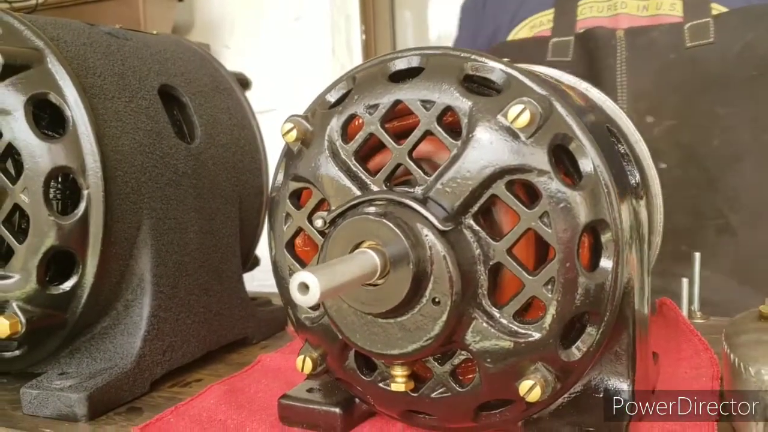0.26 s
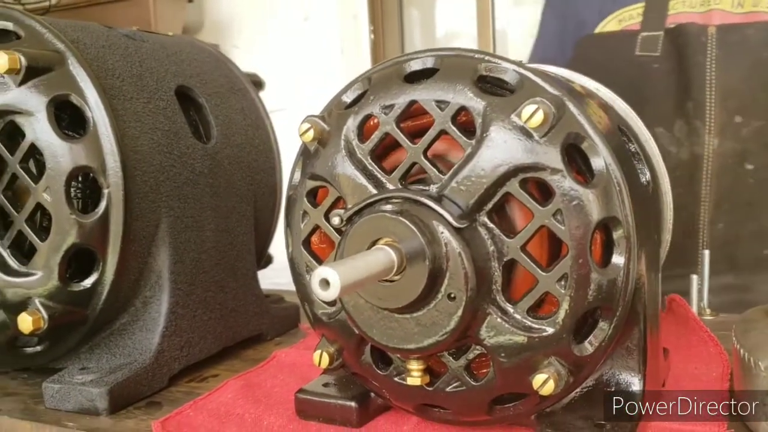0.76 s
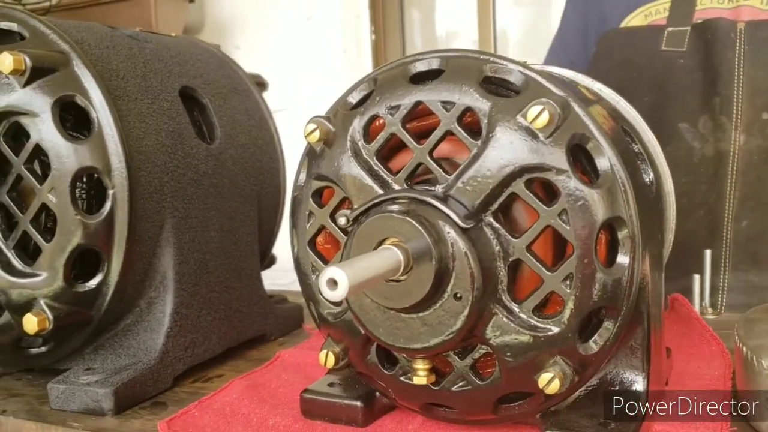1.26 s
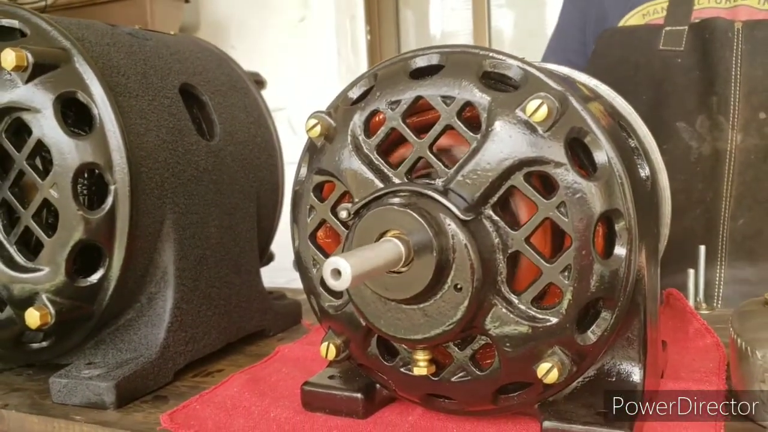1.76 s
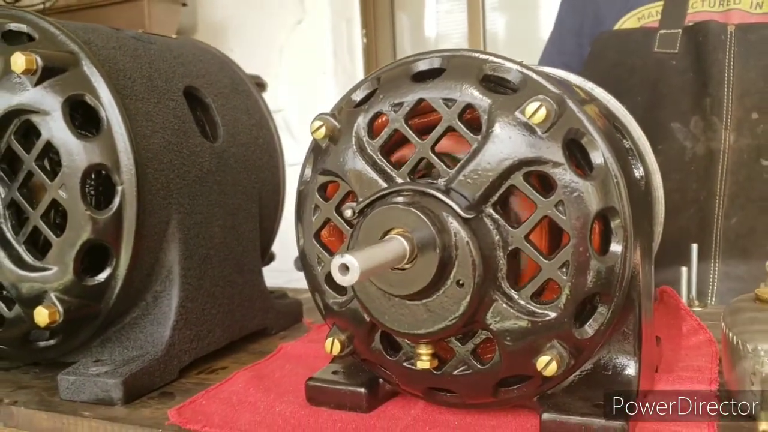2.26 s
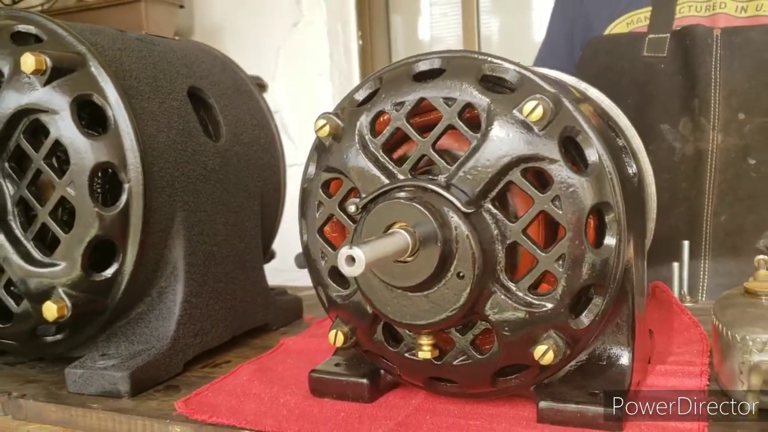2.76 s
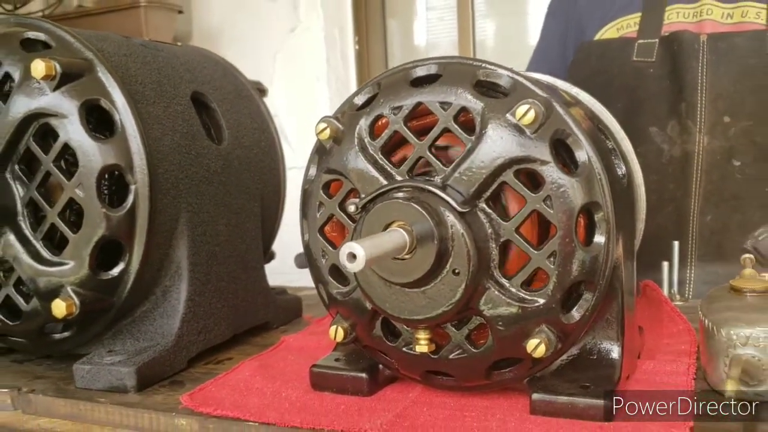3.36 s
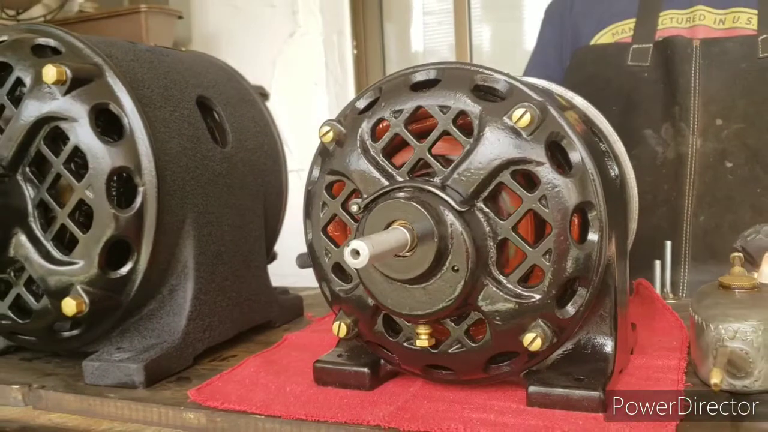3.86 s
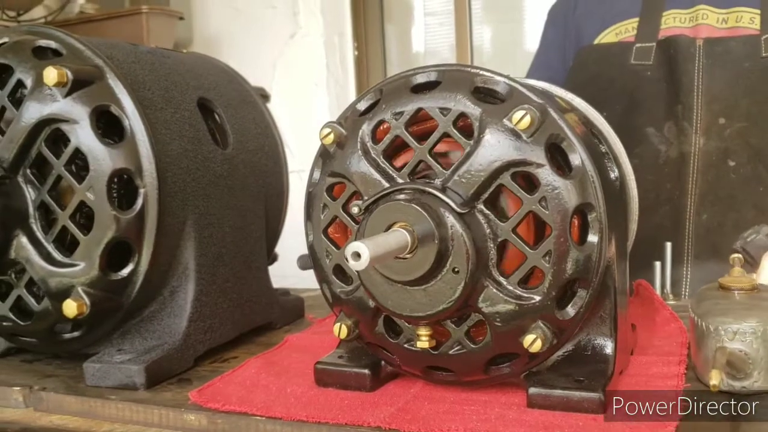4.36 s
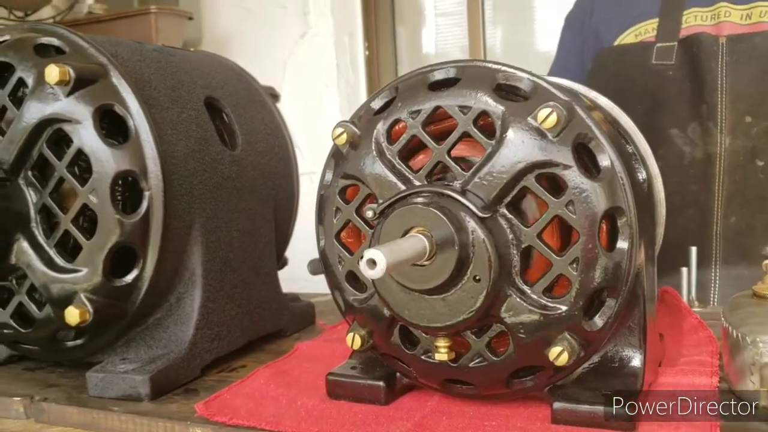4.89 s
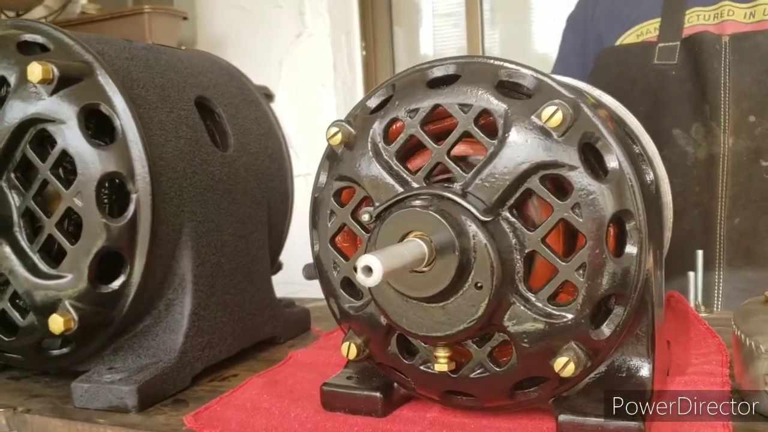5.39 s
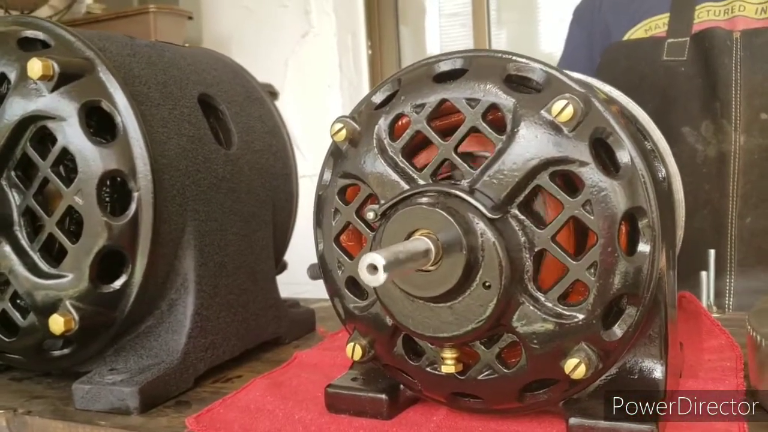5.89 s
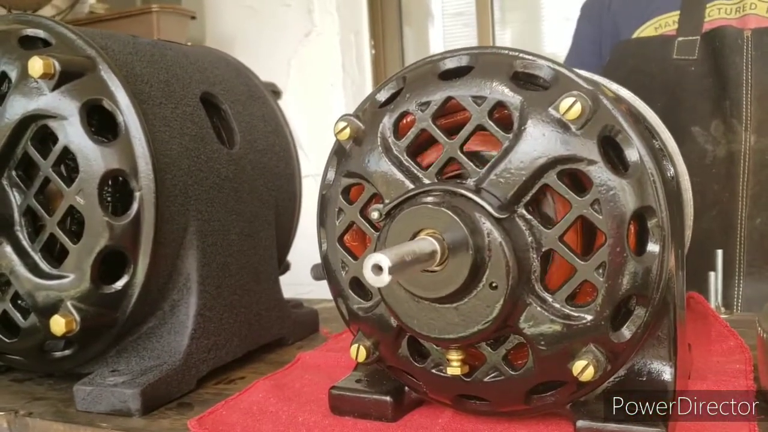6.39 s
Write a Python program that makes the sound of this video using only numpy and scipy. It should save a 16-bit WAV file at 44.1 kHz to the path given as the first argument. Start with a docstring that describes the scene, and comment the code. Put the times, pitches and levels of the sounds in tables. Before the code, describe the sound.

Close stereo sound of an old electric motor coasting down on a workshop bench. A bright, buzzy metallic whine falls steadily in pitch within crisp brush hiss. Soft low thumps from the bench flutter quickly at first, then disappear before the middle. The whine weakens into grainy ticking and the hiss dulls, pulsing once per turn. Tiny high squeaks gather near the end over quiet room rumble.

```python
"""On a workshop bench an old electric motor coasts down. Its brushes hiss on the commutator (the ring of
copper bars they rub on): noise that swells at high spots once a turn and pulses at every bar.
Ticks at the bar edges make a falling song. An unbalanced rotor thumps the resonant bench once a turn,
and when the motor is slow the brushes squeak in short whistles. Behind it lies a quiet shop:
room noise, a low rumble and hums that waver."""
import sys
import numpy as np
from scipy import signal
from scipy.fft import rfft, irfft, next_fast_len
from scipy.io import wavfile
from scipy.ndimage import uniform_filter1d

SR = 44100
rng = np.random.default_rng(int(sys.argv[2]) if len(sys.argv) > 2 else 0)


def output_pcm(signal):
    """Save a mono or channel-first signal as 16-bit PCM at the path in sys.argv[1].

    Samples are clipped to [-1, 1] before scaling.
    """
    pcm = np.clip(np.atleast_2d(signal).T, -1, 1) * 32767
    wavfile.write(sys.argv[1], SR, np.round(pcm).astype(np.int16))


N = 292510
SIZE = next_fast_len(N, True)   # length of the Fourier transforms, in samples

# Colour of the room noise. Each row: frequency in Hz, relative density in dB per Hz.
SHOP_COLOUR = [(15, -28), (25, -32), (60, -3.5), (100, -3), (150, -4), (250, -10), (386, -13), (550, -12),
               (800, -10), (1230, -13), (1700, -12), (2400, -21), (3310, -15.5), (4000, -30.5), (5000, -45),
               (5700, -43), (8000, -62), (11700, -58), (16000, -20)]
# Hums in the shop. Each row: frequency in Hz, waver width in Hz, usual level in dB, slow swell in dB.
SHOP_HUMS = [(86.9, 1.07, -55.5, 2), (119.8, 1.32, -50.5, 2), (145, 4.95, -55.5, -1.5),
             (346.8, 2.04, -63, 4)]
# The deepest sounds come and go. Each row: time in seconds, lowest hum in dB over its usual level,
# second hum in dB over its usual level, rumble level in dB.
BASS_CHANGES = [(0, 6, -17, -68), (.3, 7.5, -2.5, -57), (1.2, 6, 0.5, -66), (1.45, 0, -2, -57.5),
                (2.5, -10, -0.5, -55), (2.7, -1, -2.5, -56), (2.9, 2, 5, -54), (3.4, -1, 0.5, -55),
                (3.9, -1, 0, -54), (4.1, 7, 0, -56), (5.1, 1, -0.5, -54), (5.4, -6, -1, -58),
                (6.63, 1, 0.5, -56)]
# Ways the bench rings when thumped. Each row: frequency in Hz, relative push in dB,
# time to die away by 60 dB in seconds.
BENCH_MODES = [(184.4, 7.5, 0.35), (166, 1.5, 0.12), (202, 4.5, 0.23), (223, 9, 0.13), (287, 8, 0.07)]
# Brush squeaks. Each row: middle in seconds, level in dB before doubling, row number of the voice.
SQUEAK_EVENTS = [(4.75, -46, 2), (5.745, -47, 2), (5.86, -47, 0), (5.965, -52, 0), (6.026, -50, 0),
                 (6.074, -47, 0), (6.147, -48, 1), (6.167, -47, 2), (6.27, -55, 0), (6.317, -44, 0),
                 (6.392, -51, 2), (6.54, -46, 0), (6.546, -67, 1), (6.567, -43, 2), (6.598, -45, 0)]
# Squeak voices. Each row: frequency in Hz, half of the length in seconds, left over right in dB.
SQUEAK_VOICES = [(6540, 0.02, 7), (11500, 0.024, 4), (11920, 0.041, 5)]
# How the motor frame passes the bar ticks. Each row: frequency in Hz, relative gain in dB.
FRAME_GAIN = [(600, -45), (900, -30), (1050, -15), (1200, -14), (1350, -5), (1500, -5), (1700, -14),
              (1910, -1), (2030, -12), (2300, -10), (2800, -12), (3170, 0), (3400, -3), (3600, -2),
              (4000, 0), (4500, 0), (5000, 2), (5500, 3), (7000, 4), (9000, 5), (11000, 5), (13000, 4),
              (16000, 0)]
# Resonances and dips of the brush gear. Each row: frequency in Hz, width in Hz, lift in dB.
BRUSH_GEAR = [(2750, 300, -3), (3165, 170, 4.2), (3850, 250, 2), (4230, 200, -4), (4510, 190, 6),
              (4900, 300, 3.5), (5300, 250, -5), (6020, 330, 3.5), (6600, 350, 2), (7350, 450, 2.5),
              (8820, 160, 6.5), (9030, 160, 5), (10420, 600, 6), (11900, 500, 2.5), (13200, 450, 2),
              (14400, 500, 1.5)]
# Colour of the brush friction. Each row: frequency in Hz, relative density in dB per Hz.
HISS_COLOUR = [(500, -59), (900, -32), (1500, -29.5), (2000, -20.5), (2300, -19.5), (2700, -22.5),
               (3500, -29.5), (4300, -20), (5300, -15.5), (6500, -18), (8200, -12.5), (9500, -16.5),
               (11000, -13.5), (13000, -12), (16000, -14)]
# High spots on the commutator. Each row: place in the turn (0 to 1), width in turns, share of the swell.
HIGH_SPOTS = [(0.0, .045, 1.0), (.37, .04, .35), (.8, .04, .35)]
# Depth of the once-a-turn swell, scaled down in the lower bands. Each row: time in seconds, depth in dB.
SWELL_DEPTH = [(0, 2.5), (2.2, 2), (3.2, 4.5), (4.5, 5), (5.4, 2.5), (6.0, 0)]
# How alike left and right noise are. Each row: frequency in Hz, likeness (0 to 1).
SIDE_LIKENESS = [(60, 0.92), (130, 0.91), (290, 0.79), (640, 0.17), (1400, 0.016), (15000, 0.028)]
# Difference in colour between the sides. Each row: frequency in Hz, left over right in dB.
SIDE_BALANCE = [(60, 1), (100, 0.5), (180, 1), (310, 1.5), (550, 2), (950, 2), (1650, -1), (2860, -1),
                (4970, 2), (8640, 1), (15000, -0.5)]

ROOM_DB, RUMBLE_SWELL_DB = -44, 2.5
RUMBLE_HZ, RUMBLE_WIDTH_HZ = 40.8, 43
BARS = 40   # copper bars around the commutator
# the rotor slows by bearing friction and by air drag that grows with the square of the speed
START_TURNS_PER_S, FRICTION_TURNS_PER_S2, DRAG_PER_TURN = 18.627, 2.0182, .002186
# the knock grows while the rotor slows, until it is too slow to lift off the bench
KNOCK_AT = .85   # place in the turn, 0 to 1
KNOCK_DB, KNOCK_RISE_DB = -50.5, 8   # at the first speed, and rise per octave of speed lost
KNOCK_ENDS_TURNS_PER_S, KNOCK_FADE_TURNS_PER_S = 11.47, 0.49
# level at the first speed, and its loss per octave of speed lost (straight, and squared)
TONE_DB, TONE_LOSS_DB, TONE_LOSS_SQUARED_DB = -25.5, 2.5, 4   # bar song
HISS_DB, HISS_LOSS_DB, HISS_LOSS_SQUARED_DB = -30, -0.54, 1.5
# treble cut in dB per octave above 4 kHz (below zero is a lift), and its growth per octave of speed lost
DULL_DB, DULL_GAIN_DB = -6.5, 5.5
# the straight path: later on the right, and its strength against one reflection
RIGHT_LAG_S, STRAIGHT = .0005, 7
CUTOFF_HZ = 15470


def from_db(db):
    """Turn decibels into gain."""
    return 10 ** (np.asarray(db) / 20)


def rms_one(x):
    """Scale a signal to an average strength (rms) of 1."""
    return x / np.sqrt(np.mean(x ** 2) + 1e-20)


def in_time(rows):
    """Draw the columns of a table as curves over all samples."""
    s, *columns = np.transpose(rows)
    return [np.interp(np.arange(N) / SR, s, c) for c in columns]


def at_hz(points, hz):
    """Read a table at any frequency, with straight lines over log frequency."""
    table_hz, values = np.array(points).T
    return np.interp(np.log(np.maximum(hz, 1)), np.log(table_hz), values)


def drift(rate_hz):
    """Slow random wandering of spread 1: noise through two smoothers, made at every 40th sample."""
    r = np.exp(-80 * np.pi * rate_hz / SR)
    noise = rng.standard_normal(N // 40 + 2002)
    slow = signal.lfilter([1], [1, -2 * r, r * r], noise)[2000:]   # skip the filter's start
    return np.interp(np.arange(N) / 40, np.arange(len(slow)), rms_one(slow))


def coloured(gain):
    """Spectrum of stereo noise of rms 1, shaped by a gain; sides share a middle part by their likeness."""
    hz = np.fft.rfftfreq(SIZE, 1 / SR)
    mid, side = rfft(rng.standard_normal((2, SIZE))) * gain(hz)
    alike = np.clip(at_hz(SIDE_LIKENESS, hz), 0, 1)
    pair = np.sqrt(1 + alike) * mid + np.sqrt(1 - alike) * side * [[1], [-1]]
    return pair / np.sqrt(np.mean(irfft(pair, SIZE) ** 2)), hz


def shop(waver):
    """Room noise, a low rumble and tones that waver in pitch and level."""
    low_hum_db, second_hum_db, rumble_db = in_time(BASS_CHANGES)
    room, _ = coloured(lambda hz: from_db(at_hz(SHOP_COLOUR, hz)))
    out = from_db(ROOM_DB) * irfft(room, SIZE)[:, :N]
    rumble, _ = coloured(lambda hz: 1 / (1 + (2 * (hz - RUMBLE_HZ) / RUMBLE_WIDTH_HZ) ** 4))
    out += from_db(rumble_db + RUMBLE_SWELL_DB * drift(3.7)) * irfft(rumble, SIZE)[:, :N]
    for k, (hum_hz, width, db, swell_db) in enumerate(SHOP_HUMS):
        pitch = hum_hz + waver * width * drift(width)
        level_db = db + swell_db * drift(3.3) + 0.85 * drift(18.0)
        level_db = level_db + (k == 0) * low_hum_db + (k == 1) * second_hum_db
        out += from_db(level_db) * np.sqrt(2) * np.sin(2 * np.pi * np.cumsum(pitch) / SR)
    return out


def rotor_speed():
    """Turns per second of a rotor braked by steady friction and air drag."""
    scale = np.sqrt(FRICTION_TURNS_PER_S2 / DRAG_PER_TURN)
    t = np.arange(N) / SR
    return scale * np.tan(np.arctan(START_TURNS_PER_S / scale) - scale * DRAG_PER_TURN * t)


def bench_knock(turns, scatter_db, soft_hz, soften_db):
    """The unbalanced rotor pushes the bench once a turn and its modes ring; higher modes weaken as it slows."""
    at = np.interp(np.arange(int(turns[-1])) + KNOCK_AT, turns, np.arange(N)).astype(int)
    octaves = np.log2(np.gradient(turns)[at] / turns[0])   # against the first speed, below zero when slower
    out = np.zeros(N)
    for hz, db, t60 in BENCH_MODES:
        push = np.full(N, 1e-18)
        scatter = scatter_db * rng.standard_normal(len(at))
        push[at] = from_db(db + scatter + soften_db * octaves * np.log2(hz / BENCH_MODES[0][0]))
        r, w = from_db(-60 / (t60 * SR)), 2 * np.pi * hz / SR
        out += signal.lfilter([0, np.sin(w)], [1, -2 * r * np.cos(w), r * r], push)
    band = signal.butter(2, [0.78 * soft_hz, 1.45 * soft_hz], "band", fs=SR, output="sos")
    return rms_one(signal.sosfilt(band, out))


def squeaks(rough):
    """Short stick-slip whistles: a tone with randomly wandering phase under a smooth swell."""
    t, out = np.arange(N) / SR, np.zeros((2, N))
    for s, db, voice in SQUEAK_EVENTS:
        hz, half_length, pan_db = SQUEAK_VOICES[int(round(voice))]
        near = slice(int((s - half_length) * SR), min(int((s + half_length) * SR), N))
        u = t[near] - s
        steps = rng.standard_normal((2, len(u)))
        wobble = np.cumsum(steps, axis=1) * rough * (6600 / hz) ** 2   # high squeaks are purer
        tone = np.sin(2 * np.pi * hz * u + wobble[0] + 0.45 * wobble)   # the sides wander a little apart
        swell = np.cos(np.pi * u / (2 * half_length)) ** 2
        out[:, near] += tone * swell * from_db([[db + pan_db / 2], [db - pan_db / 2]])
    return out * 2


def gear_db(hz):
    """Lift or dip in dB from the resonances of the brush gear."""
    return sum(db / (1 + (2 * (hz - f) / w) ** 2) for f, w, db in BRUSH_GEAR)


def paths(echo_s, coloured_share=0.):
    """Each side hears a near source through its own smear of close, fading reflections."""
    age = np.arange(2048) / SR
    echoes = rng.standard_normal((2, len(age))) * np.exp(-age / echo_s)
    echoes[[0, 1], [0, int(RIGHT_LAG_S * SR)]] = STRAIGHT
    smear = rfft(echoes, SIZE)
    size = abs(smear)
    # the timing is kept whole, the colour only in part
    return smear / size * (size / np.sqrt(np.mean(size ** 2))) ** coloured_share


def clicks(at, sizes):
    """Spectrum of clicks placed between samples, on a grid eight times finer."""
    fine = np.zeros(8 * SIZE)
    np.add.at(fine, np.clip((8 * at).astype(int), 0, 8 * N), sizes)
    return rfft(fine)[:SIZE // 2 + 1]


def bar_song(turns, level_db, eccentric, uneven, jitter, wander, scatter_db, waver_db):
    """Each bar edge ticks under the brush; bars out of place repeat every turn and widen the harmonics."""
    bar = np.arange(int(turns[-1] * BARS))
    # the commutator is out of round in several lobes
    lobes, phases = np.arange(1, 7)[:, None], rng.random((6, 1))
    run_out = np.sum(np.sin(2 * np.pi * (lobes * bar / BARS + phases)) / np.sqrt(lobes), axis=0)
    place = bar + eccentric * run_out + uneven * rng.standard_normal(BARS)[bar % BARS]
    place = place + jitter * rng.standard_normal(len(bar))
    place = place + wander * np.interp(place / BARS, turns, drift(25))   # the brush rocks in its holder
    sizes = from_db(scatter_db * rng.standard_normal(BARS)[bar % BARS])
    ticks = clicks(np.interp(place / BARS, turns, np.arange(N)), sizes)
    hz = np.fft.rfftfreq(SIZE, 1 / SR)
    heard = ticks * paths(echo_s=.006, coloured_share=.25)
    heard = heard * from_db(at_hz(FRAME_GAIN, hz) + gear_db(hz))
    # half-octave bands swell and fade apart; the top band stays steady
    step, song = np.clip(2 * np.log2(np.maximum(hz, 1) / 1400), 0, 5), 0
    for k in range(6):
        band = irfft(heard * np.clip(1 - abs(step - k), 0, 1), SIZE)[:, :N]
        song = song + band * from_db(waver_db * drift(4) * (k < 5))
    # even out the loudness over one second before setting the level
    return from_db(level_db) * song / np.sqrt(uniform_filter1d(np.mean(song ** 2, axis=0), SR))


def brush_hiss(turns, level_db, dull_db, swell_db, bar_depth, patchy_db, grain_db, rub_db, direct):
    """Friction noise in the brush gear, pressed harder at the high spots and pulsed by every bar."""
    pair, hz = coloured(lambda hz: from_db(at_hz(HISS_COLOUR, hz) + gear_db(hz)))
    shared = abs(pair[0]) * np.exp(2j * np.pi * rng.random(len(hz)))
    # direct is the share that both sides have in common
    pair = np.sqrt(direct) * shared * paths(echo_s=0.003) + np.sqrt(1 - direct) * pair
    spots = 0
    for at, width, share in HIGH_SPOTS:
        distance = (turns - at + .5) % 1 - .5   # in turns
        spots = spots + share * np.exp(-.5 * (distance / width) ** 2)
    swell = swell_db * (spots - spots.mean())
    out, together = 0, drift(37)
    step = 2 * np.log2(np.maximum(hz, 700) / 4000)   # half octaves from 4 kHz
    for k in range(-5, 5):
        band = irfft(pair * np.clip(1 - abs(step - k), 0, 1), SIZE)[:, :N]
        reach = np.clip((k + 3) / 6.5, 0, 1.2)   # pressure changes show most in the treble
        flicker = patchy_db * np.array([together + drift(4.7), together + drift(30)])
        flicker = flicker + grain_db * drift(25)
        rub = rub_db * drift(18) * (k < 1)   # only in the lower bands
        out = out + band * from_db(reach * (swell + flicker) + rub - dull_db * max(k, 0) / 2)
    return out * from_db(level_db) * (1 + bar_depth * np.cos(2 * np.pi * BARS * turns))


def scene():
    """The shop and the slowing motor, whose speed drives knock, song and hiss."""
    speed = rotor_speed()
    turns = np.cumsum(speed) / SR
    slowed = np.log2(speed[0] / speed)   # octaves of speed lost
    lifts = 1 / (1 + np.exp((KNOCK_ENDS_TURNS_PER_S - speed) / KNOCK_FADE_TURNS_PER_S))
    bench = bench_knock(turns, scatter_db=0.7, soft_hz=192, soften_db=55)
    knock = from_db(KNOCK_DB + KNOCK_RISE_DB * slowed) * lifts * bench
    tone_db = TONE_DB - TONE_LOSS_DB * slowed - TONE_LOSS_SQUARED_DB * slowed ** 2
    # the first four settings are shifts counted in bars
    song = bar_song(turns, tone_db, eccentric=.03, uneven=.005, jitter=.003, wander=.011,
                    scatter_db=1.2, waver_db=1.6)
    hiss_db = HISS_DB - HISS_LOSS_DB * slowed - HISS_LOSS_SQUARED_DB * slowed ** 2
    hiss = brush_hiss(turns, hiss_db, DULL_DB + DULL_GAIN_DB * slowed, in_time(SWELL_DEPTH)[0],
                      bar_depth=0.091, patchy_db=.6, grain_db=.9, rub_db=.9, direct=0.4)
    return shop(waver=0.634) + knock + squeaks(rough=.1) + song + hiss


def record(dry):
    """The two sides differ a little in colour; a steep filter cuts the top."""
    lean = at_hz(SIDE_BALANCE, np.fft.rfftfreq(SIZE, 1 / SR)) / 2
    wet = irfft(rfft(dry, SIZE) * from_db([lean, -lean]), SIZE)[:, :N]
    return signal.sosfilt(signal.ellip(12, .3, 80, CUTOFF_HZ, fs=SR, output="sos"), wet)


dry = scene()
out = record(dry)
output_pcm(out)
```